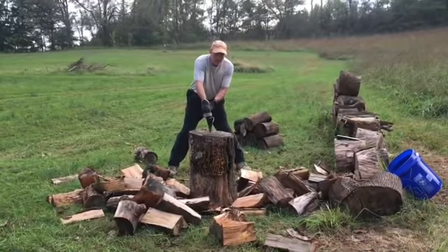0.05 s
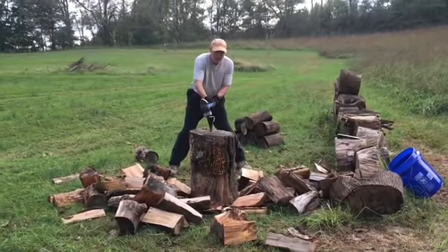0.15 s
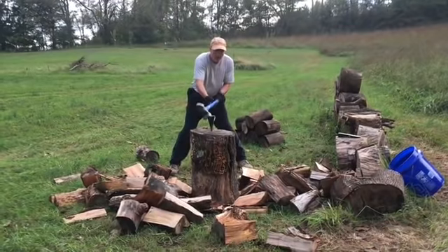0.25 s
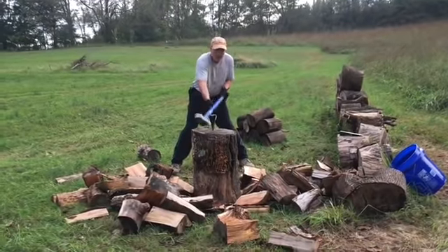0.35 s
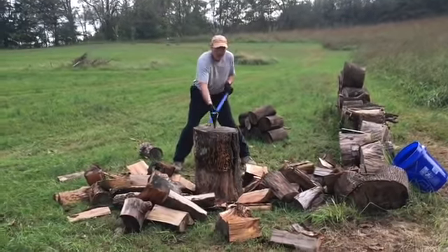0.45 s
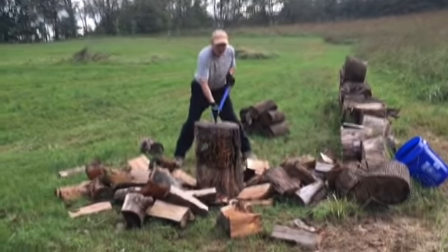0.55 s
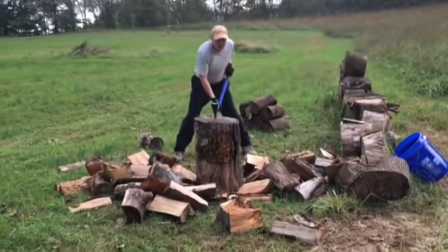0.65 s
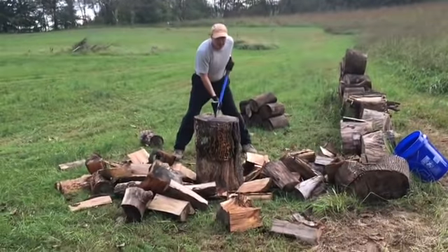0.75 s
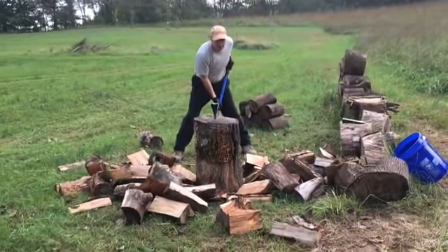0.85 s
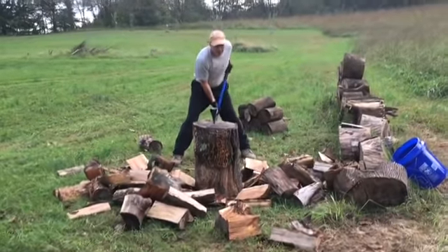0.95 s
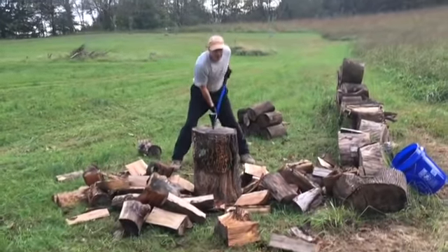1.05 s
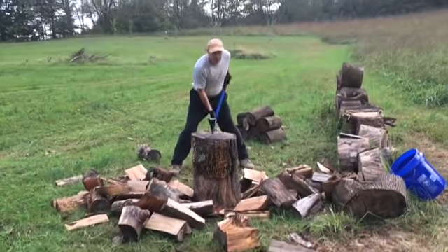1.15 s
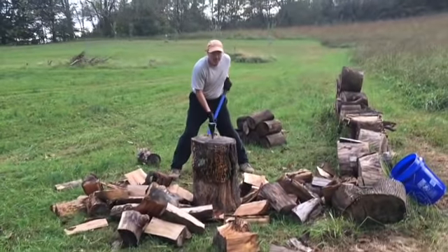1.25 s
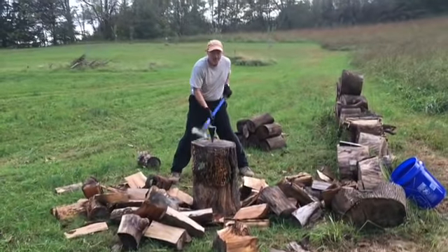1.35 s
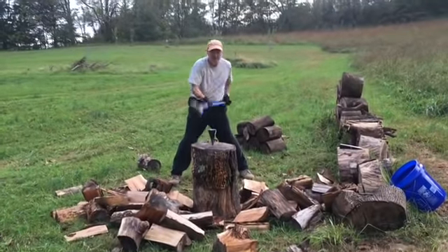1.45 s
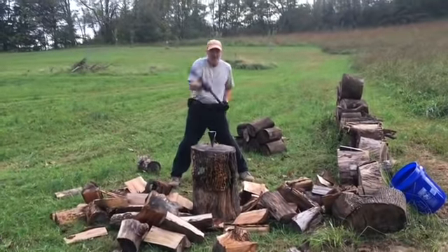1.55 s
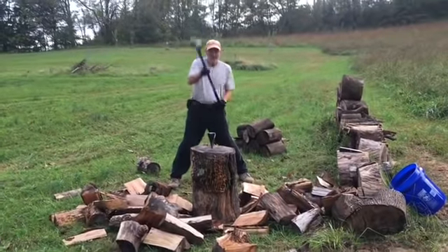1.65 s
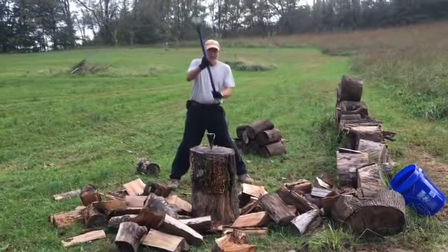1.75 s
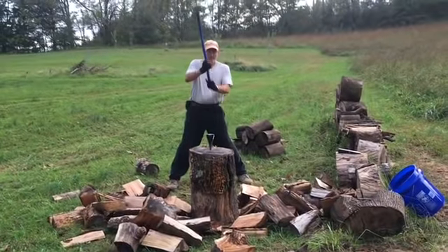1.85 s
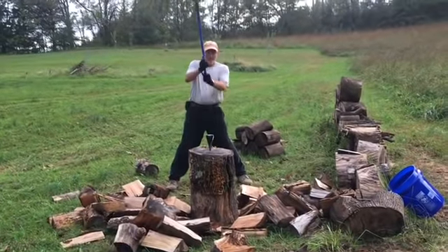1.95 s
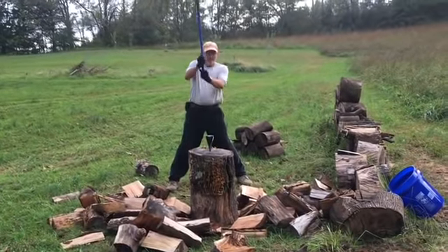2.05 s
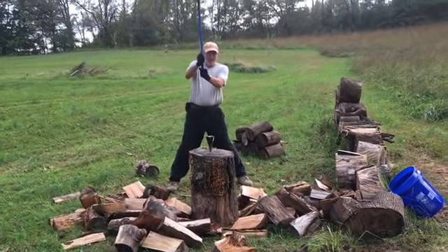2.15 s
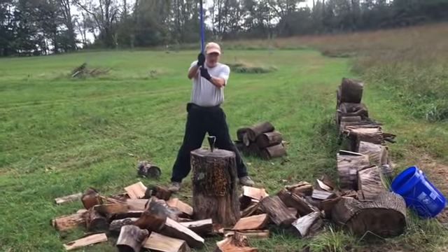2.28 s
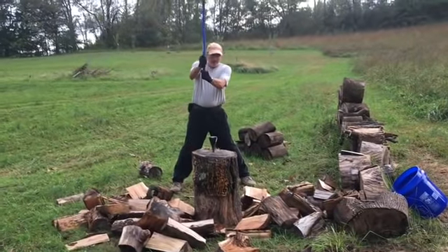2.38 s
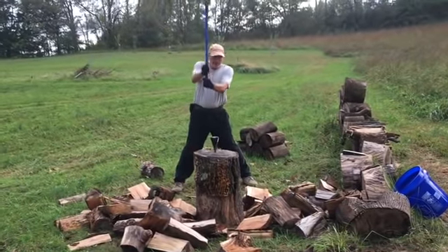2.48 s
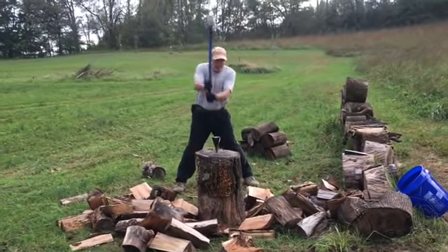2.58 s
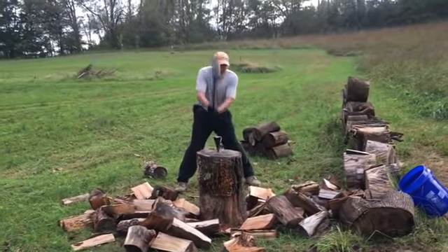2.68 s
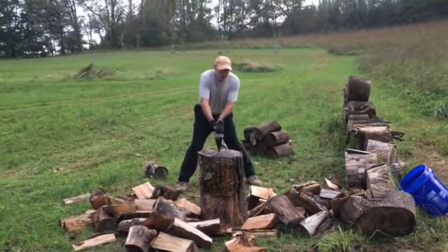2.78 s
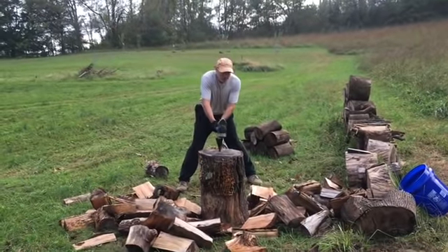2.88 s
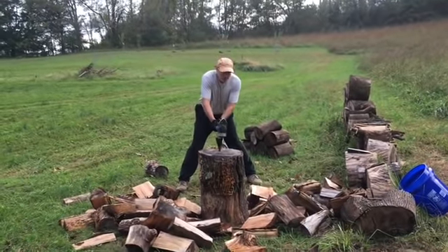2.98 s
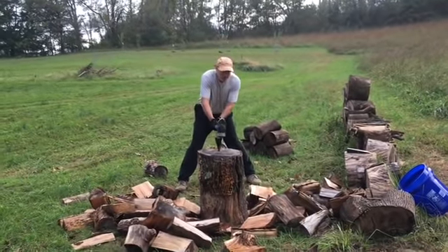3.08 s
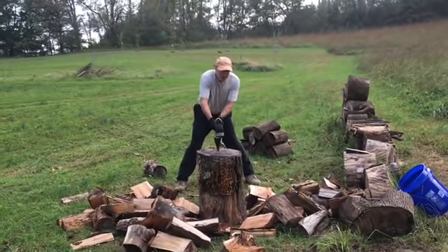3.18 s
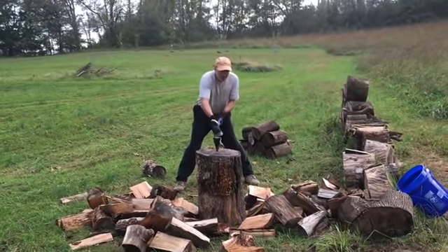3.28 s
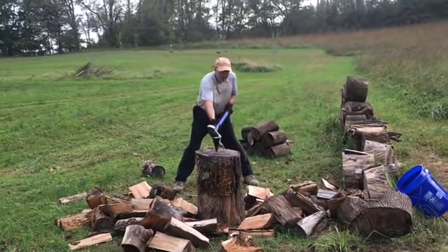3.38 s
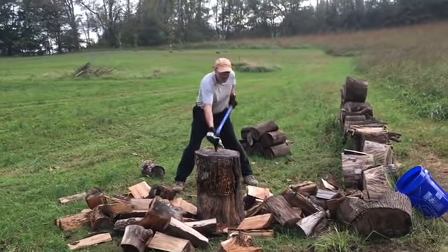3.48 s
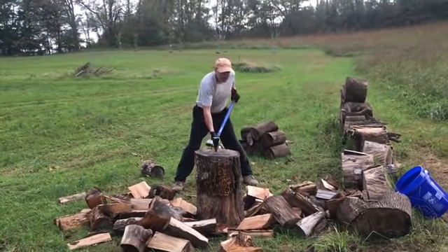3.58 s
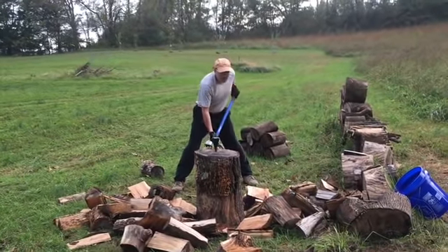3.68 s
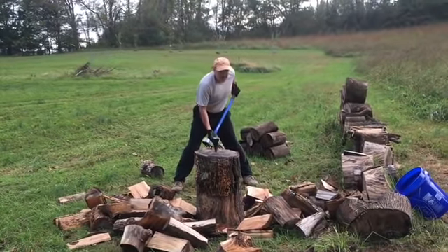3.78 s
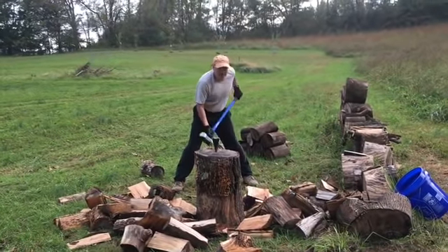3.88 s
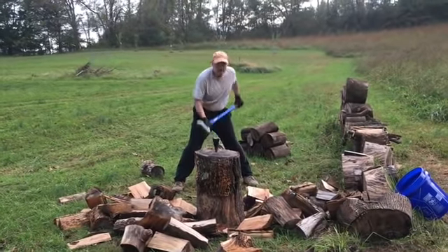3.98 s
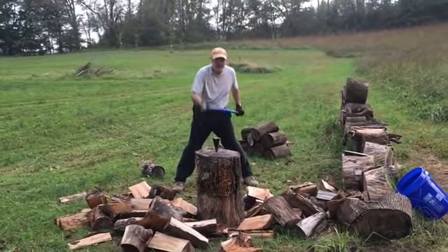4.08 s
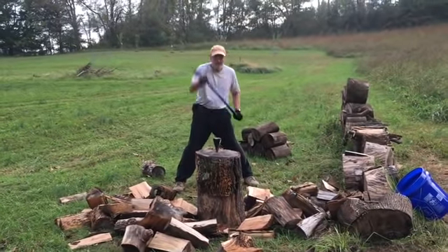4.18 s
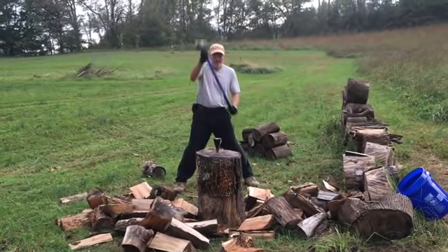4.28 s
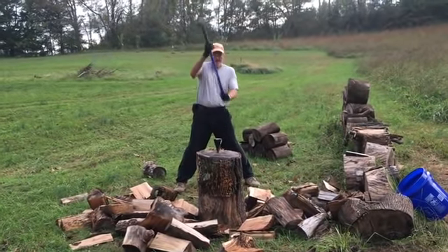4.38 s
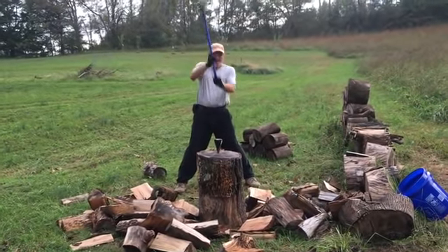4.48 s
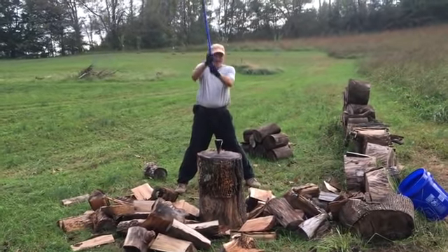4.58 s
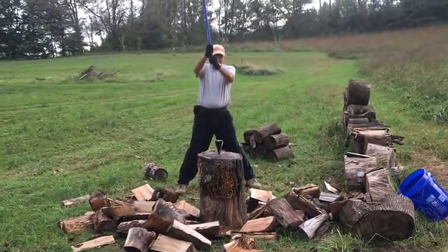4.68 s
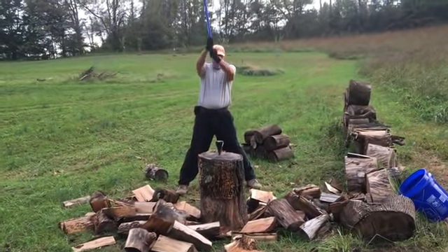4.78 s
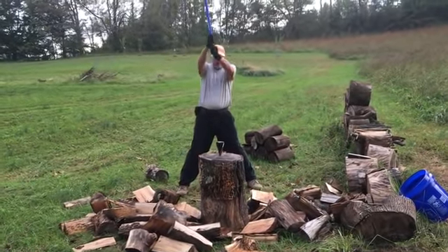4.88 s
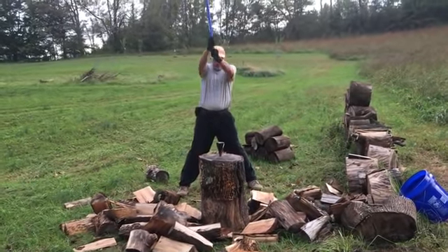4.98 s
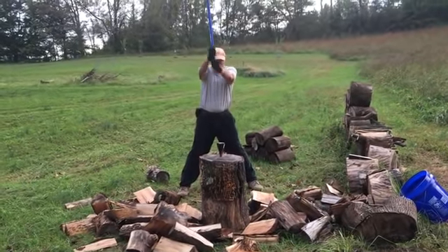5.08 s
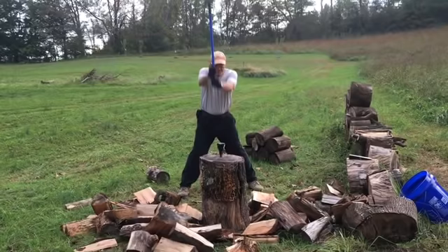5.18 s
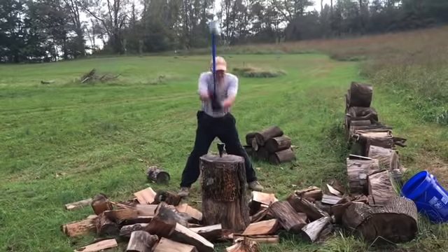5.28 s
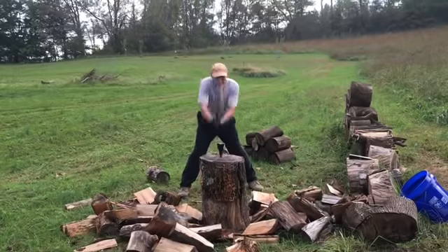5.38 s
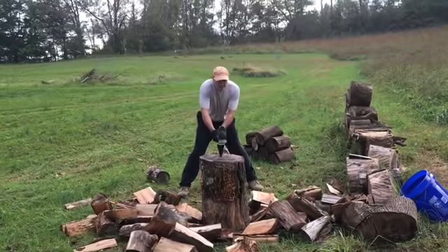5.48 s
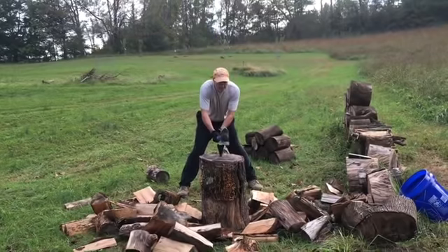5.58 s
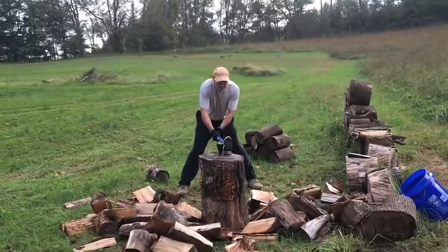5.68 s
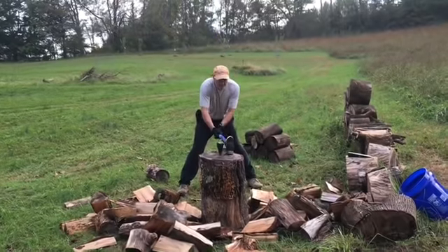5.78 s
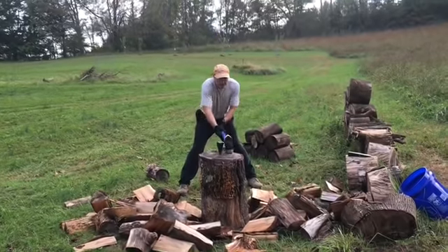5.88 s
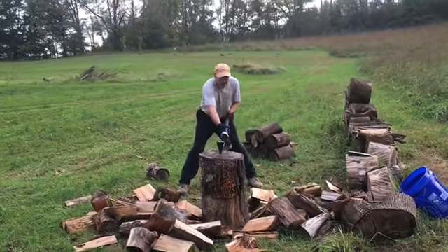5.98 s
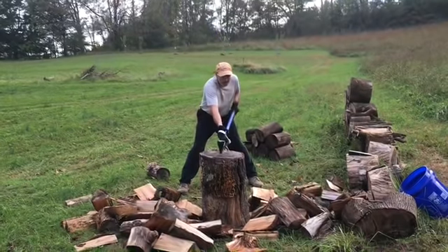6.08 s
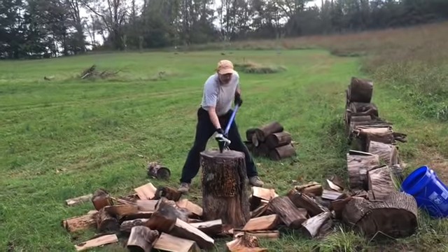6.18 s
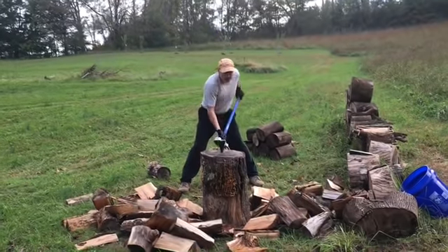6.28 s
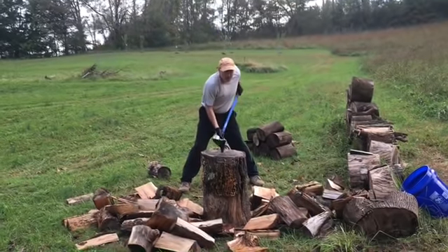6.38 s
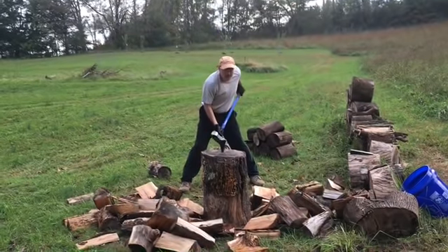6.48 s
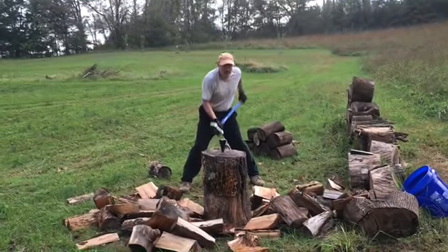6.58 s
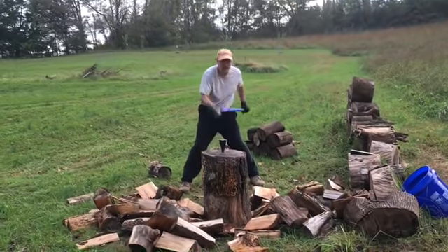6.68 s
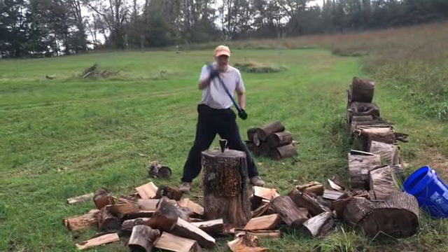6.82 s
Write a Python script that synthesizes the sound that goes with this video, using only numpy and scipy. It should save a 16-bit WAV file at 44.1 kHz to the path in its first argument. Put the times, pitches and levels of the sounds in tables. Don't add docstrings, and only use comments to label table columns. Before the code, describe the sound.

Close outdoor wood splitting: fading echo, light hammer-head tap, quiet insects and faint low rumble, then a very loud steel clang with cracking fibres and a low jolt. Gloves slide faintly on the handle and small knocks tick. A second clang hits, darker and woodier, followed by a hollow thump as the head drops on the log. Short rings and tree-line scatter decay behind. The loud strikes distort the microphone.

```python
import sys
import numpy as np
from scipy import signal
from scipy.fft import rfft, irfft
from scipy.io import wavfile
from scipy.ndimage import uniform_filter1d

SR = 44100
rng = np.random.default_rng(int(sys.argv[2]) if len(sys.argv) > 2 else 0)


def to_wav(sig):
    pcm = np.clip(np.atleast_2d(sig), -1, 1) * 32767
    pcm = np.round(pcm).astype(np.int16)
    wavfile.write(sys.argv[1], SR, pcm.T)


def undo_db(level):
    steps = np.asarray(level, float) / 20
    return 10 ** steps


N = 302085
LEAD = SR // 2

# start in seconds, steel in dB, log in dB, crack in dB, contact time in seconds.
BLOWS = [
    (-.24, -12.5, 2, -14.5, 0.0086),
    (2.829, -2, -6.5, -4.5, 0.013),
    (5.489, -1, -2.5, -5, 0.014),
]
# Dull, then ringing modes of wedge and hammer head, in Hz.
DULL_HZ = [1443, 1615, 1820, 2330, 3280, 3628, 4025, 4450, 5090, 5620]
RINGING_HZ = [6400, 6600, 6890, 6975, 7170, 7272, 8760, 10700, 10780, 13750]
# t60 in seconds, level in dB in the earlier blows, in dB in the last blow.
STEEL_MODES = [(0.0053, -12, -20), (.03, -16.5, -11), (.03, -14, -6), (0.02, -15, -5), (0.048, -15.5, -9.5),
               (0.0083, -11.5, -20.5), (.02, -16, -17), (0.029, -15.5, -16), (.02, -20, -20.5),
               (0.014, -21, -20.5), (.03, -17, -16), (0.013, -13, -19), (0.02, -14.5, -16),
               (0.048, -6.5, -18), (0.039, -15.5, -10), (0.019, -14.5, -19.5), (.05, -23, -14.5),
               (0.08, -17.5, -15.5), (0.066, -21, -14.5), (.25, -35, -44)]
# mode in Hz, t60 in seconds, level in dB in the earlier blows, in dB in the last.
LOG_MODES = [(73, 0.12, -26, -20.5), (342, 0.045, -25.5, -4), (656, 0.03, -14, -8),
             (821.2, 0.036, 11.5, 2.5), (1080, 0.025, -12, -24)]
# frequency in Hz, level in dB.
CRACK_COLOUR = [(200, -25), (600, -26), (900, -5.5), (2000, -10.5), (4000, -6.5), (5800, -11.5),
                (7000, -2.5), (9000, -20), (16000, -26.5)]

# delay after the blow in seconds, level in dB, pitch in Hz,
# t60 in seconds.
JOLT = [
    (.005, -19, 85, .18),
    (.072, -16, 198, 0.087),
    (.073, -15, 270, .055),
]
# start in seconds, pitch factor, extra delay of the rocking in seconds.
JOLTING_BLOWS = [(2.829, 1.001, -.001), (5.489, 1.23, .002)]
# mode in Hz, level in dB, t60 in seconds.
RIM_MODES = [(303, -22, 0.031), (695, -37, 0.068), (844, -14.5, 0.038), (1160, -36, 0.046),
             (1475, -31, 0.027)]
# mode in Hz, level in dB, t60 in seconds.
END_GRAIN_MODES = [(194.3, -8.5, 0.077), (254, -2.5, 0.079), (352, -10.5, 0.082), (618, -9, .035),
                   (695, 9.5, .022), (755, -7.5, 0.061), (1085, -13.5, .035), (1317, -12, 0.031),
                   (1690, -16.5, .035), (2090, -22.5, .05), (2660, -23.5, .04), (3133, -28, .012)]
# start in seconds, level in dB, pitch in Hz, t60 in seconds.
TICKS = [(0.03, -47.5, 1200, 0.31), (.042, -46.5, 950, 0.26), (.09, -48, 870, .3),
         (0.136, -43.5, 306, 0.22), (1.168, -47, 5800, .02), (2.862, -21.5, 112, 0.06),
         (3.052, -40, 224, 0.093), (3.744, -42, 355, 0.059), (3.883, -45.5, 352, .08),
         (4.115, -55.5, 9120, .01), (4.489, -43, 3507, .022), (4.514, -41, 3600, .02),
         (5.525, -23, 200, 0.072), (5.588, -19, 186, 0.075), (5.847, -26.5, 234, 0.036),
         (5.898, -32, 235, 0.038), (6.309, -42, 347, .09), (6.391, -41, 398, .066),
         (6.515, -38, 350.6, 0.057)]

# delay in seconds, level in dB, smear in seconds.
ECHOES = [(.02, -24, 0.0082), (.069, -29, 0.0085), (.114, -30, 0.0044), (.153, -39, 0.01), (.206, -36, .01),
          (.255, -39, 0.017), (.35, -44, .02)]
# band centre in Hz, level in dB, t60 in seconds.
TREE_LINE = [(150, -45, 0.87), (280, -41, 1.3), (520, -42.5, 2.2), (900, -46.5, 3.1), (2030, -44.5, 2.5),
             (3980, -43.5, 2.1), (6976, -40.5, 1.3), (11000, -46, 1.0), (14970, -61.5, .4)]

# start in seconds, time to full pressure in seconds, hold in seconds, level in dB.
GLOVE_SLIDES = [(0.208, .16, 0.064, -55), (1.686, 0.051, 0.11, -60.5), (1.869, 0.018, 0.063, -57.5),
                (3.154, .25, .11, -52), (4.273, 0.068, 0.15, -55.5), (4.52, 0.025, 0.039, -53),
                (5.82, 0.21, 0.11, -52.5)]
# frequency in Hz, level in dB per Hz.
GLOVE_COLOUR = [(710, -9.5), (1200, -26), (1770, -1), (2450, -6.5), (4410, 3.5), (4910, -0.5), (9210, -1),
                (14800, -9.5), (16000, -9)]

# start in seconds, length in seconds, pitch in Hz, level in dB.
TRILLS = [(0.55, .31, 4080, -64.5), (.99, 0.3, 4085, -71), (1.746, 0.36, 4070, -66),
          (3.85, 0.33, 4075, -68.5), (6.34, .31, 4060, -67.5), (.77, 0.17, 4610, -65),
          (0.85, 0.29, 4654, -61), (1.72, .28, 4620, -69), (2.58, .2, 4580, -62.5),
          (4.6, 0.41, 4700, -69.5), (5.099, .3, 4600, -73.5), (6.385, 0.27, 4570, -63.5),
          (6.62, 0.32, 4650, -61.5), (1.74, .31, 4370, -63), (4.299, 0.38, 4370, -74),
          (5.22, 0.21, 4390, -65.5)]
# time in seconds, level in dB.
CRICKET_SWELL = [(0, -65), (.9, -63.5), (1.6, -62.5), (2.7, -62.5), (3.8, -73.5), (4.15, -64.5), (4.8, -63),
                 (5.4, -65), (6.3, -73), (6.5, -63), (6.9, -59.5)]
# time in seconds, level in dB.
KATYDID_SWELL = [(0, -68), (1.5, -66.5), (2.7, -71.5), (3.8, -67), (4.8, -64.5), (5.4, -64), (6.3, -66.5),
                 (6.9, -64)]
# band centre in Hz, width in Hz, level in dB.
FAR_KATYDIDS = [(6350, 560, -71.5), (6750, 230, -73.5)]

# delay in seconds, length in seconds, start in Hz, end in Hz, level in dB.
PHRASE = [(0, .018, 2600, 2600, -62), (.016, .017, 2680, 2870, -55), (.068, .024, 3250, 3880, -52),
          (.178, .027, 2922, 2905, -55.5)]
PHRASE_STARTS = [2.17, 2.591]
# start in seconds, length in seconds, start in Hz, end in Hz, level in dB.
LOOSE_NOTES = [(2.13, .023, 2190, 2200, -65), (2.385, .03, 2500, 2200, -60), (2.656, .022, 3430, 3350, -50)]
# start in seconds, length in seconds, start in Hz,
# end in Hz, level in dB.
WARBLE = [(1.485, .05, 3500, 3350, -57.5), (1.567, 0.066, 3250, 2750, -56), (1.612, .06, 2400, 2140, -62),
          (1.617, 0.05, 2940, 3070, -58), (5.352, 0.0402, 3800, 3600, -51.5), (5.4, .05, 3416, 3190, -55),
          (5.44, .03, 3170, 3080, -52)]
# start in seconds, length in seconds, final pitch in Hz, level in dB,
# scatter in dB.
SEEPS = [(2.728, .075, 7810, -55.5, 2), (5.078, .09, 7470, -71, 13.5)]
# frequency in Hz, level in dB per Hz.
MEADOW_COLOUR = [(15, -41), (25, -28), (55, 2), (110, -3), (170, -16), (260, -21), (600, -31), (1200, -34),
                 (3000, -38.5), (7600, -42.5), (9500, -44), (10500, -49.5), (11500, -44.5), (16000, -41.5)]


def rms_one(x):
    return x / np.sqrt(np.mean(x ** 2) + 1e-20)


def coloured(points, size):
    hz, level_db = np.transpose(points)
    log_hz = np.log(np.fft.rfftfreq(size, 1 / SR) + 1)
    gain = undo_db(np.interp(log_hz, np.log(hz), level_db))
    return rms_one(irfft(rfft(rng.standard_normal(size)) * gain, size))


def band_pass(low_hz, high_hz, x):
    return signal.sosfilt(signal.butter(2, [low_hz, high_hz], "band", fs=SR, output="sos"), x)


def high_pass(hz, x):
    return signal.sosfilt(signal.butter(2, hz, "high", fs=SR, output="sos"), x)


def drift(rate_hz):
    knots = rng.standard_normal(N // 64 + 2)
    r = np.exp(-128 * np.pi * rate_hz / SR)
    slow = signal.filtfilt([1 - r], [1, -r], knots)
    return np.interp(np.arange(N) / 64, np.arange(len(slow)), rms_one(slow))


def in_time(s, values):
    return np.interp(np.arange(N) / SR, s, values, left=0, right=0)


def ring(push, hz, t60):
    r = undo_db(-60 / (t60 * SR))
    w = 2 * np.pi * hz / SR
    return signal.lfilter([0, np.sin(w)], [1, -2 * r * np.cos(w), r * r], push + 1e-18)


def add(track, s, sound):
    at = round(s * SR)
    track[at:at + len(sound)] += sound[:len(track) - at]


def hammer():
    near, spread = np.zeros((2, N + LEAD))
    for k, (s, *strength) in enumerate(BLOWS):
        direct, sent = blow(*strength, last=k == 2)
        add(near, s + LEAD / SR, direct)
        add(spread, s + LEAD / SR, sent)
    t = np.arange(SR // 4) / SR
    for s, level_db, hz, t60 in knocks():
        soft = (1 - np.exp(-t * hz * 3.0)) ** 2
        knock = undo_db(level_db - 60 * t / t60) * soft * np.sin(2 * np.pi * hz * t)
        add(near, s + LEAD / SR, knock)
        add(spread, s + LEAD / SR, 0.16 * knock)
    echoes = signal.fftconvolve(spread, meadow_echo())[:len(near)]
    return (near + echoes)[LEAD:]


def blow(steel_db, log_db, crack_db, contact, last):
    t = np.arange(SR // 2) / SR
    sinking = np.exp(-(t / contact) ** 4)

    chatter = rng.standard_normal(len(t)) * sinking * 0.064
    chatter[0] += 1
    steel = np.zeros(len(t))
    for hz, (t60, earlier_db, last_db) in zip(DULL_HZ + RINGING_HZ, STEEL_MODES):
        steel += undo_db(steel_db + (last_db if last else earlier_db)) * ring(chatter, hz, t60)
    steel = high_pass(900, steel)

    shove = t * np.exp(-t / 0.00037)
    rough = rng.standard_normal(len(t)) * sinking * t / contact
    shove = 1.1 * shove / shove.sum() + 0.09 * rough
    log = np.zeros(len(t))
    for hz, t60, earlier_db, last_db in LOG_MODES:
        log += undo_db(log_db + (last_db if last else earlier_db)) * ring(shove, hz, t60)

    fibres = undo_db(crack_db) * coloured(CRACK_COLOUR, len(t))
    crack = fibres * (sinking + 0.014 * np.exp(-t / 0.016))
    sharp_front = undo_db(crack_db + 24) * np.exp(-t / 3e-5)
    return steel + log + crack, 0.91 * steel + 0.036 * log + 0.34 * crack + sharp_front


def knocks():
    rows = []
    for s, pitch, late in JOLTING_BLOWS:
        for k, (delay, level_db, hz, t60) in enumerate(JOLT):
            rocking_delay = late if k > 0 else 0
            rows.append((s + delay + rocking_delay, level_db, hz * pitch, t60))
    for s, modes in [(.2522, RIM_MODES), (5.7295, END_GRAIN_MODES)]:
        for hz, level_db, t60 in modes:
            rows.append((s + .9 / hz, level_db, hz, t60))
    return rows + TICKS


def meadow_echo():
    t = np.arange(2 * SR) / SR
    echoes = np.zeros(len(t))
    u = t[:SR // 10]
    for delay, level_db, smear in ECHOES:
        burst = rng.standard_normal(len(u)) * np.exp(-u / smear) * (1 - np.exp(-u / .004))
        add(echoes, delay, undo_db(level_db + 6) * burst / np.sqrt(np.sum(burst ** 2)))
    out = band_pass(600, 9000, echoes)
    for hz, level_db, t60 in TREE_LINE:
        swell = (1 - np.exp(-t / 0.033)) * undo_db(1.8 * drift(22)[:len(t)])
        scatter = band_pass(hz / 1.456, min(hz * 1.33, .45 * SR), rng.standard_normal(len(t)))
        out += undo_db(level_db - 13.0 - 60 * t / t60) * swell * scatter
    return out


def glove():
    gain = np.zeros(N)
    for start, attack, hold, level_db in GLOVE_SLIDES:
        end = start + attack + hold
        s = [start - .1, start, start + attack, end, end + .07]
        shape_db = in_time(s, [40, 41, 60, 60, 35])
        gain += undo_db(level_db - 60 + shape_db) * (shape_db > 0)
    return gain * undo_db(3.0 + 0.73 * drift(60)) * coloured(GLOVE_COLOUR, N)


def birds():
    out, flutter = np.zeros(N), drift(150)
    song = [(s + delay, *note) for s in PHRASE_STARTS for delay, *note in PHRASE] + LOOSE_NOTES
    for notes, blur in [(song, .1), (WARBLE, 0.6)]:
        for s, length, start_hz, end_hz, level_db in notes:
            u = np.linspace(0, 1, round(length * SR))
            phase = 2 * np.pi * np.cumsum(start_hz + (end_hz - start_hz) * u) / SR
            shake = 1 - blur + blur * flutter[round(s * SR):][:len(u)]
            swell = np.abs(np.sin(np.pi * u)) ** .7
            add(out, s, undo_db(level_db) * shake * swell * np.sin(phase))
    for delay in (.025, .045):
        add(out, delay, undo_db(-16.5) * out.copy())
    return out + seeps()


def seeps():
    out = np.zeros(N)
    top_hz, hold, fall = 9350, .02, 0.014
    scatter = rng.standard_normal(SR // 2) * np.exp(-np.arange(SR // 2) / SR / .08)
    scatter /= np.sqrt(np.sum(scatter ** 2))
    for s, length, end_hz, level_db, scatter_db in SEEPS:
        t = np.arange(round(length * SR)) / SR
        pitch = end_hz + (top_hz - end_hz) * np.exp(-np.maximum(t - hold, 0) / fall)
        swell = np.sin(np.pi * t / length) ** .7
        call = undo_db(level_db) * swell * np.sin(2 * np.pi * np.cumsum(pitch) / SR)
        add(out, s, call)
        add(out, s, undo_db(scatter_db) * signal.fftconvolve(call, scatter))
    return out


def insects():
    out = undo_db(in_time(*np.transpose(CRICKET_SWELL))) * chorus(4440, width_hz=340)
    fade = .03
    for s, length, hz, level_db in TRILLS:
        gate = in_time([s, s + fade, s + length - fade, s + length + fade], [0, 1, 1, 0])
        strokes_per_s = 13 + 6.85 * hz / 1e3
        out += undo_db(level_db + 2.3 * drift(25)) * gate * trill(hz, strokes_per_s, duty=.65, sweep_hz=40)
    katydid = 0.5 * trill(5750, 38, duty=.7, sweep_hz=515) + 0.47 * chorus(5800, width_hz=500)
    out += undo_db(in_time(*np.transpose(KATYDID_SWELL))) * katydid
    out += undo_db(-78.5) * trill(7225, 46, duty=.5, sweep_hz=80)
    for hz, width_hz, level_db in FAR_KATYDIDS:
        out += undo_db(level_db) * chorus(hz, width_hz)
    return out


def trill(hz, strokes_per_s, duty, sweep_hz):
    stroke = np.cumsum(strokes_per_s * (1 + 0.0067 * drift(2))) / SR % 1 / duty
    stroke = np.minimum(stroke, 1)
    gate = 0.24 + np.sin(np.pi * stroke)
    pitch = hz * (1 + 0.0035 * drift(3)) + sweep_hz * (.5 - stroke)
    return rms_one(gate * np.sin(2 * np.pi * np.cumsum(pitch) / SR))


def chorus(hz, width_hz):
    band = band_pass(hz - width_hz / 2, hz + width_hz / 2, rng.standard_normal(N))
    return rms_one(band * undo_db(1.2 * drift(8.7)))


def meadow_air():
    return undo_db(-46.5 + 1.0 * drift(2)) * coloured(MEADOW_COLOUR, N)


def scene():
    return (hammer() + glove() + birds() + insects() + meadow_air())[None]


def overload_lead_in(x):
    over = uniform_filter1d(np.abs(high_pass(3000, x)), size=128) > .12
    front = x * over * (1 - signal.lfilter([.006], [1, -.994], over))
    early_bursts = undo_db(-25) * np.roll(front, -1024) + undo_db(-30) * np.roll(front, -512)
    early_bursts = signal.lfilter([.7], [1, -.3], early_bursts)
    backwards = front[::-1]
    whistle = undo_db(-32) * ring(backwards, 3100, 0.032) + undo_db(-43.5) * ring(backwards, 880, 0.03)
    return (early_bursts + whistle[::-1]) * ~over


def top_cut(x):
    return signal.sosfilt(signal.butter(12, 16380, fs=SR, output="sos"), x)


def record(dry):
    cut = signal.sosfilt(signal.cheby2(14, 40, 16000, fs=SR, output="sos"), dry[0])
    clipped = np.clip(cut, -1, 1)
    mix = (clipped + overload_lead_in(clipped))[None]
    return top_cut(mix)


dry = scene()
out = record(dry)
to_wav(out)
```